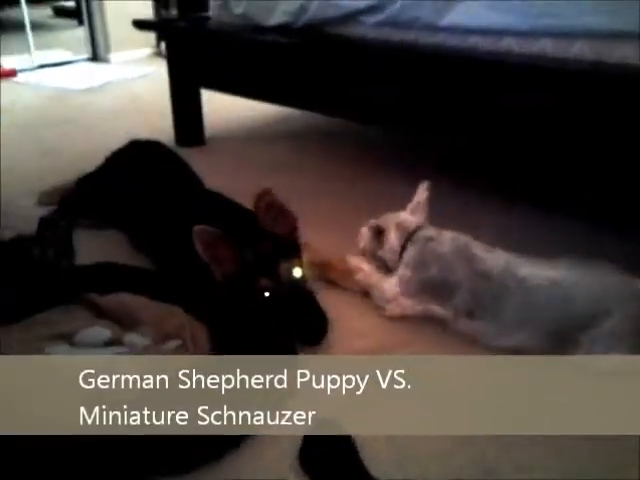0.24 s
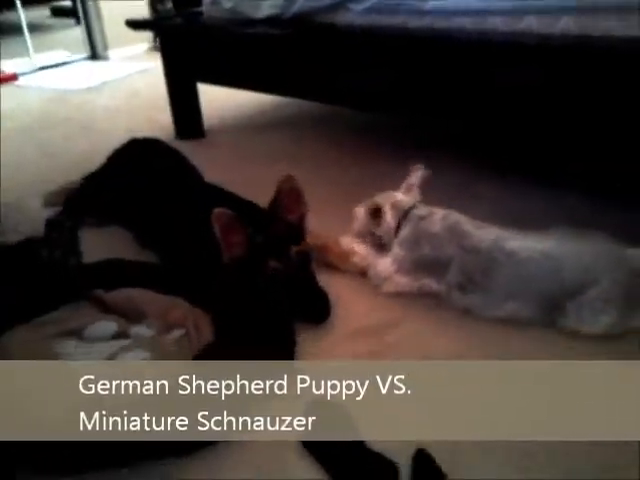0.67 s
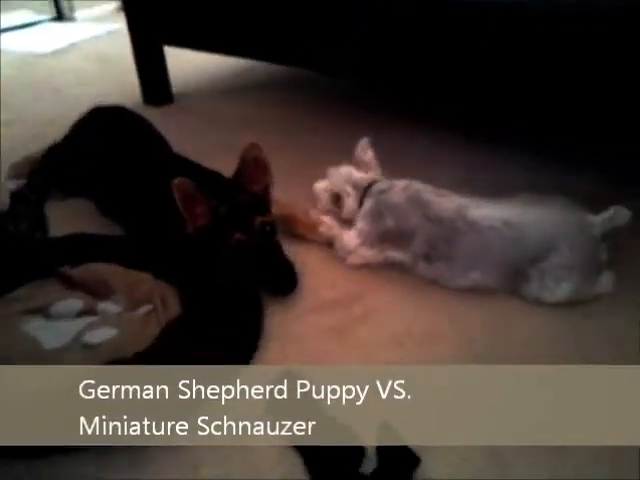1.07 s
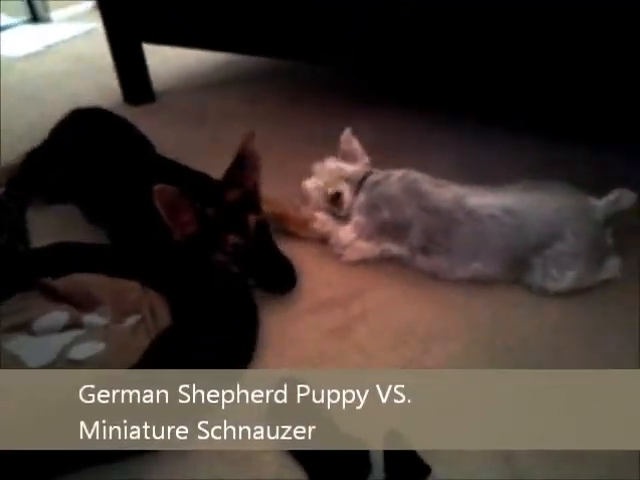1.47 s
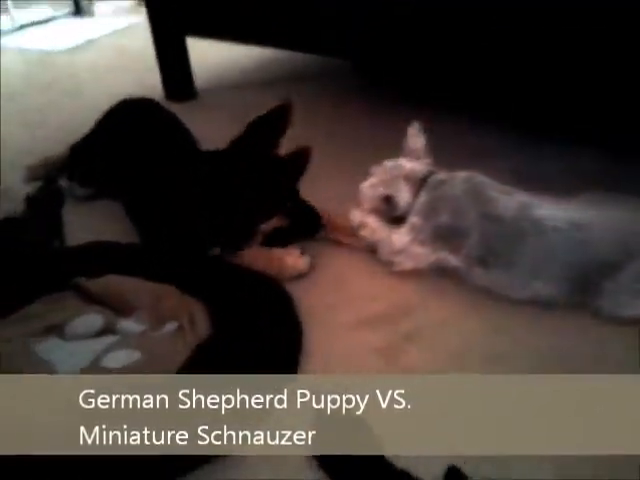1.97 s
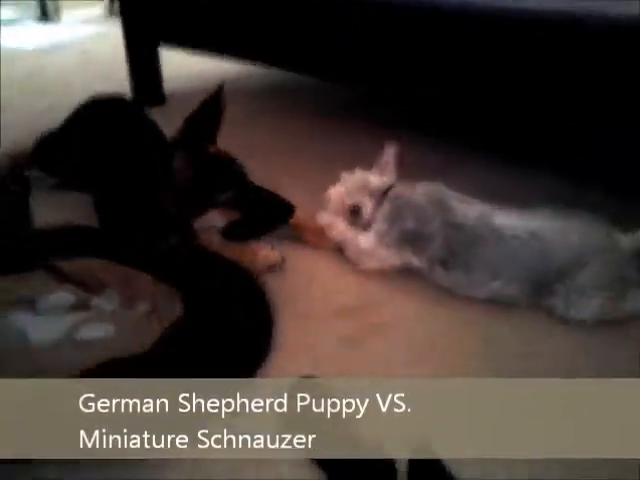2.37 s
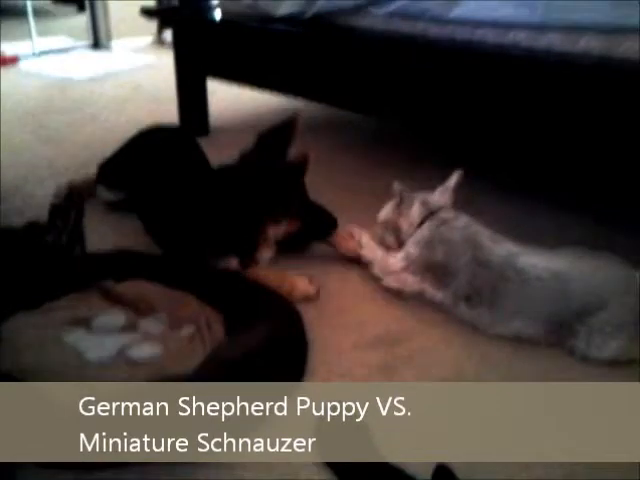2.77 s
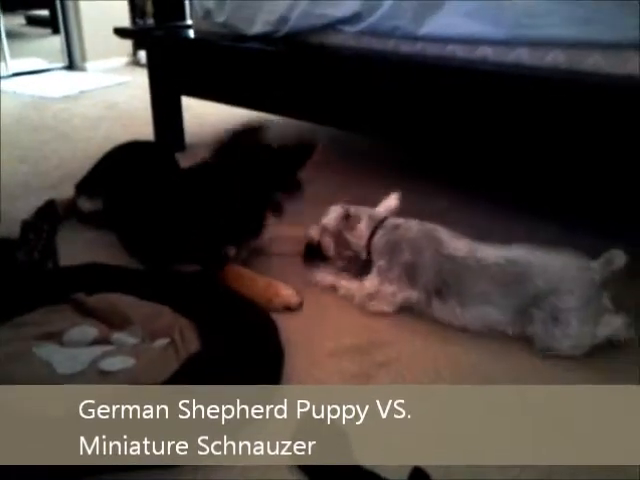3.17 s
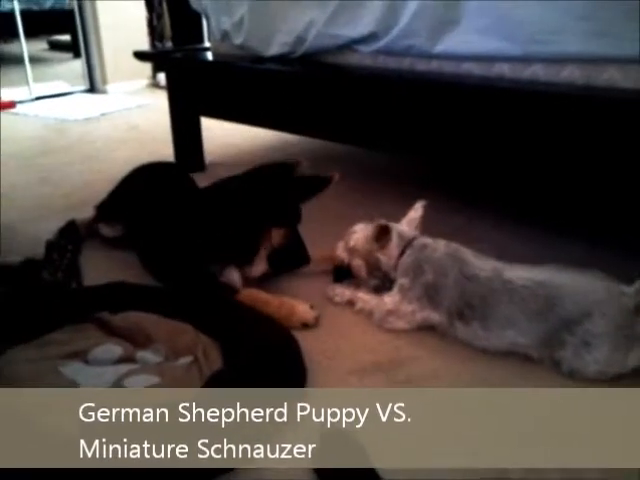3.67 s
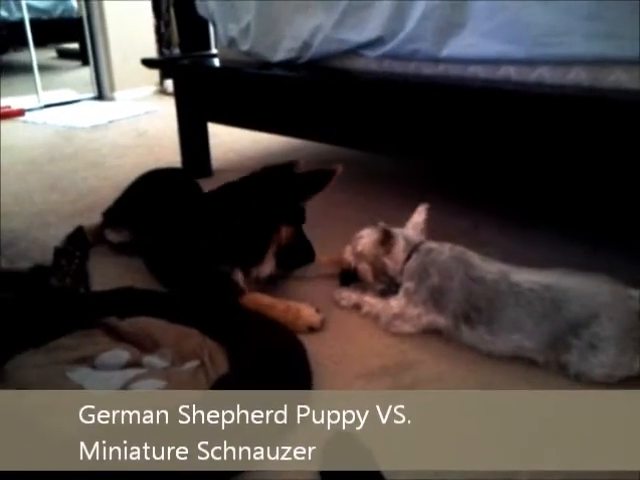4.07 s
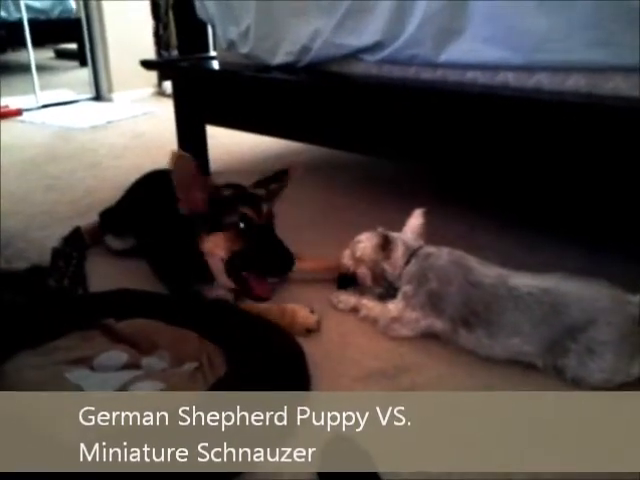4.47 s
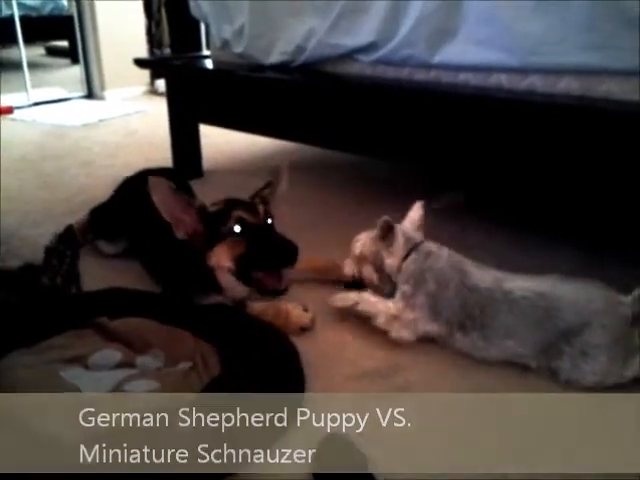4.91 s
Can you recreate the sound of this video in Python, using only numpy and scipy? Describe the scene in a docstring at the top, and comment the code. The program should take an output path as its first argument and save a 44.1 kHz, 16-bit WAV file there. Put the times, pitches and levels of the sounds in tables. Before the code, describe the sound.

Indoors, with brief room ring and faint low background noise, a dog gnaws something hard in irregular clicks. A puppy whines very high through its nose, yelps twice and moans. Two fast yips, a paw thump and a bark follow, then slow separate growl pulses, a muted woof, another short growl, and a loud, slightly overloaded yelp and moan.

```python
"""Two dogs squabble over a chew

On a bedroom carpet a shepherd puppy whistles through its nose, yelps and moans; a small schnauzer gnaws,
snaps with yips, a bark and a woof, and growls in slow separate pulses. Voices are harmonic sources shaped
by a throat filter, whistles are gliding tones, bites and growl pulses ring resonances, and air, scuffs, puffs
and a thump are coloured noise. The room rings briefly and the loudest yelps overload the microphone."""
import sys
import numpy as np
from scipy import signal
from scipy.fft import rfft, irfft, next_fast_len
from scipy.io import wavfile

SR = 44100
rng = np.random.default_rng(int(sys.argv[2]) if len(sys.argv) > 2 else 0)


def generate_wav(signal):
    """Clip the signal to [-1, 1] and save it as 16-bit WAV at the path in sys.argv[1]."""
    frames = np.transpose(np.atleast_2d(signal))
    scaled = np.clip(frames, -1, 1) * 32767
    pcm = np.round(scaled).astype(np.int16)
    wavfile.write(sys.argv[1], SR, pcm)


N = 226787
TIME = np.arange(N) / SR
CUTOFF_HZ = 15750  # top of the recorded band

# Table levels are relative within a layer; scene() sets the gain of each layer.


def from_db(db):
    """Convert decibels to an amplitude ratio."""
    return 10 ** (np.asarray(db) / 20)


def rms_one(x):
    """Normalise the effective (rms) value to one."""
    return x / np.sqrt(np.mean(x ** 2) + 1e-20)


def at_hz(points, hz):
    """Interpolate a spectrum linearly along a logarithmic frequency axis."""
    f, value = np.transpose(points)
    return np.interp(np.log(np.maximum(hz, 1)), np.log(f), value)


def follow(rows, fade_s):
    """Piecewise-linear control: the samples covered, a raised-cosine gate, and the columns at those samples."""
    s, *columns = np.transpose(rows)
    at = np.flatnonzero((TIME > s[0] - fade_s) & (TIME < s[-1] + fade_s))
    inside = np.minimum(TIME[at] - s[0], s[-1] - TIME[at])
    gate = np.sin(np.pi / 2 * np.clip(1 + inside / fade_s, 0, 1)) ** 2
    return at, gate, [np.interp(TIME[at], s, column) for column in columns]


def span(start, length, fade_s):
    """Time window: the samples covered, a gate with soft ends, and the time since the start."""
    at, gate, (t,) = follow([(start, 0), (start + length, length)], fade_s)
    return at, gate, t


def drift(rate_hz, size):
    """Slow random modulation: white noise through a double-pole low-pass, rms 1."""
    r = np.exp(-2 * np.pi * rate_hz / SR)
    warm_up = 4000  # samples discarded while the filter settles
    slow = signal.lfilter([1], [1, -2 * r, r * r], rng.standard_normal(size + warm_up))
    return rms_one(slow[warm_up:])


def noise(colour, size, tilt_db=0):
    """Spectral shaping: white noise weighted by a colour and a tilt per octave above 500 Hz, rms 1."""
    padded = next_fast_len(size)
    hz = np.maximum(np.fft.rfftfreq(padded, 1 / SR), 1)
    gain = from_db(at_hz(colour, hz) + tilt_db * np.log2(np.maximum(hz, 500)))
    gain = gain * np.minimum(hz / colour[0][0], 1) ** 2  # falls away below the first colour point
    return rms_one(irfft(rfft(rng.standard_normal(padded)) * gain, padded)[:size])


def swell(row, colour, fade_s):
    """Turbulent noise with an exponential envelope: the level changes steadily in dB between soft ends."""
    start, length, level_db, db_per_s = row
    at, gate, t = span(start, length, fade_s)
    out = np.zeros(N)
    out[at] = gate * from_db(level_db + db_per_s * t) * noise(colour, len(at))
    return out


def resonate(x, modes):
    """Modal synthesis: parallel two-pole resonances summed with alternating signs."""
    out = 0
    for k, (hz, width, db) in enumerate(modes):
        r = np.exp(-np.pi * width / SR)
        poles = [1, -2 * r * np.cos(2 * np.pi * hz / SR), r * r]
        gain = (-1) ** k * from_db(db) * (1 - r * r) / 2
        out = out + gain * signal.lfilter([1, 0, -1], poles, x)
    return out


def add(track, s, sound):
    """Superpose a short sound on a track at a given time."""
    i = max(int(s * SR), 0)
    track[i:i + len(sound)] += sound[:N - i]


def floor_noise():
    """Stationary background: one steady coloured noise throughout."""
    # background spectrum: hz, level_db
    background_colour = [(12, -36.5), (20, -7.5), (54, -3), (144, -9.5), (180, -10), (259, -15),
                         (298, -8.5), (393, -12), (491, -15), (1100, -18.5), (1340, -14.5), (1500, -20.5),
                         (6360, -25), (15500, -30)]
    return from_db(-60) * noise(background_colour, N)


def scuffs_and_puffs(grain_db):
    """Random noise: muzzles and paws scuff the carpet, and a dog puffs, in short bursts of noise."""
    # bursts: start_s, length_s, level_db, tilt_db_per_octave
    burst_rows = [(0.0, 0.016, -48, -5.5), (0.067, 0.042, -45, 4.5), (0.125, 0.023, -48.5, 4),
                  (0.294, .045, -57, 9.5), (0.741, 0.18, -56.5, -3.5), (0.931, 0.077, -60, -4),
                  (1.25, 0.23, -63.5, 4), (2.315, 0.07, -54.5, -12), (2.818, 0.028, -47.5, -0.5),
                  (3.07, 0.039, -48.5, 3), (3.101, 0.099, -55.5, 4), (3.231, 0.097, -47, -2),
                  (4.565, 0.064, -58.5, -7.5), (4.622, 0.036, -52.5, -6.5)]
    # burst spectrum: hz, level_db
    burst_colour = [(200, -2.5), (700, -7), (2000, 2), (4000, -1.5), (7000, -3), (10000, -11),
                    (15000, -12.5)]
    out = np.zeros(N)
    for s, length, level_db, tilt_db in burst_rows:
        at, gate, (db,) = follow([(s, level_db), (s + length, level_db - 3)], fade_s=0.0065)
        grain = grain_db * drift(200, len(at))
        out[at] += gate * from_db(db + grain) * noise(burst_colour, len(at), tilt_db)
    return out


def bites(crumble, crumble_s, size=3000):
    """Impulse excitation: a crack and decaying crumbs ring the chew and jaw, differently each time."""
    # teeth cracking the chew: start_s, peak_db, tilt_db_per_octave
    bite_rows = [(0.066, -40.5, -1), (0.594, -46.5, -13), (0.728, -28, -1.0), (0.781, -30, -1.5),
                 (0.821, -33.5, -2), (0.85, -31.5, -1.0), (0.866, -34.5, -6), (0.966, -40.5, -3),
                 (1, -25.5, 2), (1.162, -37, -2.5), (1.275, -40.5, -2), (2.257, -38, 10),
                 (2.336, -36.5, -6.5), (4.437, -37, -2.5)]
    # resonances of chew and jaw: hz, width_hz, level_db
    chew_modes = [(700, 360, 4), (1360, 800, -4), (2300, 1200, -2.5), (3800, 1500, -3), (6200, 1200, -3.5),
                  (9900, 4000, -18)]
    out, t = np.zeros(N), TIME[:size]
    for s, peak_db, tilt_db in bite_rows:
        # cubed noise is sparse: a few strong crumbs
        crumbs = rng.standard_normal(size) ** 3 * np.exp(-t / crumble_s)
        crack = (t == 0) + crumble * crumbs
        modes = [(hz, width, db + rng.normal(0, 1) + tilt_db * np.log2(hz / 2000))
                 for hz, width, db in chew_modes]
        ring = resonate(crack, modes)
        add(out, s, from_db(peak_db) * ring / np.abs(ring).max())
    return out


def nose_air():
    """Turbulence: air rushes past the long whistle."""
    # air: start_s, length_s, level_db, swell_db_per_s
    air_row = (1.6, .38, -64.5, 11)
    # air spectrum: hz, level_db
    air_colour = [(1500, -4), (3500, -11), (4300, 0.5), (7000, -1.5), (9000, -17), (15000, -15)]
    return swell(air_row, air_colour, fade_s=.035)


def whistle(gesture, waver, third_db, flicker_db):
    """Whistle tone: a frequency-modulated fundamental with two overtones and a flickering level."""
    at, gate, pitch, level_db, octave_db = gesture
    phase = 2 * np.pi * np.cumsum(pitch * (1 + waver * drift(440, len(at)))) / SR
    octave = from_db(octave_db)
    tone = (np.sin(phase) + octave * np.sin(2 * phase)) / np.hypot(1, octave)
    tone = tone + from_db(third_db) * np.sin(3 * phase)
    flicker = flicker_db * drift(40, len(at))
    out = np.zeros(N)
    out[at] = np.sqrt(2) * gate * from_db(level_db + flicker) * tone
    return out


def long_whistle(fade_s):
    """Mode jump: the nasal whistle tips into its octave as its pitch sags."""
    # contour: time_s, pitch_hz, level_db
    contour = [(1.61, 4401, -53), (1.744, 4121, -52), (1.752, 4103, -42), (1.778, 4396, -52),
               (1.858, 4335, -47), (1.898, 4097, -43.5), (1.918, 4030, -50), (1.938, 3987, -45),
               (1.98, 4296, -47)]
    at, gate, (pitch, level_db) = follow(contour, fade_s)
    even_hz, hz_per_db = 4170, 14.5  # octave and fundamental are equal at even_hz
    return at, gate, pitch, level_db, (even_hz - pitch) / hz_per_db


def squeak(row, fade_s):
    """Glide: one quick sweep of a nasal tone that swells to a late peak."""
    start, length, start_hz, end_hz, bend, peak_db, octave_db = row
    at, gate, t = span(start, length, fade_s)
    peak_share, edge_db = .68, 11.5  # place of the peak in the length; drop at either end
    level_db = peak_db - edge_db * np.interp(t / length, [0, peak_share, 1], [1, 0, 1])
    pitch = start_hz + (end_hz - start_hz) * (t / length) ** bend
    return at, gate, pitch, level_db, octave_db


def squeaks():
    """Nasal whistle tones: short squeaks, each a separate glide."""
    # squeaks: start_s, length_s, start_pitch_hz, end_pitch_hz, bend (exponent), level_db, octave_db
    squeak_rows = [(1.983, .035, 5000, 5400, .6, -49, -12), (2.461, 0.04, 3790, 3330, 1.23, -38.5, 15),
                   (2.559, .04, 3190, 3830, 1, -33.5, 0), (4.819, 0.036, 4370, 3200, .7, -35, 0),
                   (4.909, 0.031, 3180, 3800, 1.63, -25, -11.5)]
    return sum(whistle(squeak(row, fade_s=.0066), waver=.018, third_db=-22, flicker_db=5.5)
               for row in squeak_rows)


def call(gesture, throat, jitter, flutter, air_db, hiss_db, clear_hz):
    """Source-filter voice: vocal-fold harmonics and puffs of air, shaped by throat and mouth resonances."""
    at, gate, pitch, level_db, mouth_db, upper_db, rough = gesture
    size = len(at)
    rough = np.clip(rough, 0, 1)
    phase = 2 * np.pi * np.cumsum(pitch * (1 + jitter * rough * drift(130, size))) / SR
    blur_hz = 70 + 450 * rough.mean()
    voice, power = 0, 0
    for k in range(1, int(CUTOFF_HZ / pitch.max()) + 1):
        hz = k * pitch
        # weights of the two resonances lifted by the mouth
        mouth = at_hz([(850, 0), (1100, 1), (1620, 1), (2000, 0)], hz)
        upper = at_hz([(1620, 0), (2000, 1), (2550, 1), (3200, .4), (4500, .25)], hz)
        gain = from_db(at_hz(throat, hz) + mouth * mouth_db + upper * upper_db)
        # high partials break up into flickering bands, wider in a rough voice
        clean = 1 / (1 + (hz / clear_hz) ** 4)
        smear = flutter * rough + (1 - clean) / 2
        shake = drift(blur_hz, size) * np.sin(k * phase) + drift(blur_hz, size) * np.cos(k * phase)
        voice = voice + gain * (clean * np.sin(k * phase) + smear * shake)
        power = power + gain ** 2 * (clean ** 2 / 2 + smear ** 2)
    # spectrum of air past the teeth: hz, level_db
    teeth_colour = [(500, -5.5), (1400, -1), (2500, 1.5), (3800, -20), (5200, -13.5), (7500, -11),
                    (10000, -26), (12000, -25), (15000, -35)]
    air = from_db(air_db) * noise(throat, size) + from_db(hiss_db) * noise(teeth_colour, size)
    puffs = air * rough * (1 + np.cos(phase))  # one puff per cycle
    sound = gate * from_db(level_db) * (voice / np.sqrt(power) + puffs)
    # high-pass below the voice: removes low rumble made by the fluttering partials
    rumble_cut = signal.butter(3, pitch.min() / 2, "high", fs=SR, output="sos")
    out = np.zeros(N)
    out[at] = signal.sosfilt(rumble_cut, sound)
    return out


def yelp(row, fade_s):
    """Driving pressure: a chest push swells the voice; pitch arches, then drops and roughens."""
    (start, length, rise_s, top_hz, end_hz, delay, attack, hold, release, push_db,
     mouth_db, mouth_swing_db, upper_db, upper_swing_db, rough) = row
    at, gate, t = span(start, length, fade_s)
    rise_breadth_s, fall_power = 0.13, 1.5
    rise = 1 - (np.minimum(t - rise_s, 0) / rise_breadth_s) ** 2
    fall = np.clip((t - rise_s) / (length - rise_s), 0, 1) ** fall_power
    pitch = top_hz * rise + (end_hz - top_hz) * fall
    push = np.interp(t, np.cumsum([delay, attack, hold, release]), [0, 1, 1, 0])
    soft_db, soft_dull_db = -24.5, 8  # unpushed: level, and loss in the upper resonance
    level_db = 20 * np.log10(push * from_db(push_db) + (1 - push) * from_db(soft_db))
    # the timbre change is complete 0.3 octave below the top pitch
    sag = np.clip(np.log2(top_hz / pitch) / .3, 0, 1)
    mouth_db = mouth_db + mouth_swing_db * sag
    upper_db = upper_db + upper_swing_db * sag - soft_dull_db * (1 - push)
    # the voice breaks at the end of the fall unless it is pushed
    rough = rough + .06 * sag + 0.19 * fall ** 2 * np.sqrt(1 - push)
    return at, gate, pitch, level_db, mouth_db, upper_db, rough


def yelps():
    """Source-filter voice: the puppy's yelps through one throat."""
    # yelps: start_s, length_s, rise_s, top_pitch_hz, end_pitch_hz, push_delay_s, push_attack_s,
    # push_hold_s, push_release_s, push_level_db, mouth_lift_db, mouth_swing_db, upper_lift_db,
    # upper_swing_db, roughness (0-1)
    yelp_rows = [(1.986, .096, .024, 814.5, 640, 0.057, 0.0096, 0.0048, .026, -7, -3, -13, -2, 11, .005),
                 (2.406, .076, 0.043, 808, 660, -0.0054, 0.029, 0.029, 0.0053, -4.5, -6.5, 10.5, 3.5, 14.5, 0.01),
                 (4.709, .096, .056, 796.7, 523, .002, 0.025, 0.058, .016, -7, 10, 15, 3, 28.5, 0.07)]
    # throat spectrum: hz, level_db
    throat = [(300, -6), (550, 0), (850, 1.5), (1450, -9.5), (2300, -19.5), (3150, -34), (3900, -49),
              (4900, -39), (6200, -42.5), (7500, -41.5), (10000, -52), (15000, -68)]
    return sum(call(yelp(row, fade_s=.008), throat, jitter=0.083, flutter=0.58,
                    air_db=-13, hiss_db=-15, clear_hz=5900) for row in yelp_rows)


def rasps():
    """Turbulence: hoarse air trails the two big yelps."""
    # rasps: start_s, length_s, level_db, swell_db_per_s
    rasp_rows = [(2.468, 0.023, -36, 58.5), (2.528, 0.12, -49, 27), (2.699, .15, -50, 20),
                 (4.788, 0.145, -34, -60), (4.98, 0.024, -51, -1)]
    # rasp spectrum: hz, level_db
    rasp_colour = [(900, -0.5), (1500, 5), (2500, 4.5), (3600, -5.5), (5200, -1), (6200, -10.5),
                   (7400, -7.5), (9000, -9), (10300, -19), (12000, -10.5), (15000, -20.5)]
    return sum(swell(row, rasp_colour, fade_s=.022) for row in rasp_rows)


def moan(curve, voicing, fade_s):
    """Formant shift: the mouth opens with pitch; the voice is rough at its onset and where it is weak."""
    at, gate, (pitch, level_db) = follow(curve, fade_s)
    mouth_db, upper_db, onset_rough = voicing
    opening = np.tanh(np.log2(pitch / np.median(pitch)) / 0.097)  # scale in octaves
    # roughness doubles with every 5.5 dB below the loudest moment
    rough = 0.05 * 2 ** ((level_db.max() - level_db) / 5.5)
    settle_s = 0.09
    rough = rough + onset_rough * np.exp(-(TIME[at] - TIME[at[0]]) / settle_s)
    return at, gate, pitch, level_db, mouth_db + 8.5 * opening, upper_db + 5 * opening, rough


def moans():
    """Source-filter voice: the puppy's moans follow drawn curves of pitch and level."""
    # one curve per moan: time_s, pitch_hz, level_db
    curves = [
        [(2.6, 664.6, -40.5), (2.648, 663, -39.5), (2.662, 680.7, -26.5), (2.72, 699.4, -22), (2.75, 696, -22),
         (2.796, 561, -40), (2.81, 543, -37)],
        [(4.94, 460.7, -25), (4.984, 422, -25.5), (5.024, 439, -23.5), (5.054, 424, -29.5), (5.12, 490, -21),
         (5.135, 495, -18)],
    ]
    # one row per moan: mouth_lift_db, upper_lift_db, onset_roughness (0-1)
    voicings = [(-5, 5, 0), (-2, 11, 0.23)]
    # throat spectrum: hz, level_db
    throat = [(250, -2), (420, 3), (720, -1), (900, -2.5), (1400, -8), (1800, -16), (2200, -19),
              (2700, -28), (3400, -68), (4100, -32.5), (5100, -40), (6000, -40), (7200, -40), (15000, -75)]
    return sum(call(moan(curve, voicing, fade_s=0.013), throat, jitter=0.063, flutter=0.47,
                    air_db=-9.5, hiss_db=-15, clear_hz=7000)
               for curve, voicing in zip(curves, voicings))


def snap(row, fade_s):
    """Fold tension: pitch reaches its extreme at the level peak; slack coarsens and throat flaps throb."""
    (start, length, peak_s, rest_hz, peak_hz, peak_db, rough,
     mouth_db, upper_db, throb_hz, throb_db, fade_db) = row
    at, gate, t = span(start, length, fade_s)
    pitch_width_s, onset_db = .025, 13  # width of the pitch extreme; rise from onset to peak
    slack = 1 - np.exp(-((t - peak_s) / pitch_width_s) ** 2)
    pitch = peak_hz + (rest_hz - peak_hz) * slack
    level_db = peak_db - np.interp(t, [0, peak_s, length], [onset_db, 0, fade_db])
    level_db = level_db - throb_db * np.sin(np.pi * throb_hz * (t - peak_s)) ** 4
    return at, gate, pitch, level_db, mouth_db + 10 * slack, upper_db + 6 * slack, rough + 0.17 * slack


def snaps_of(kind, fade_s):
    """Articulation: the gestures of one kind of short schnauzer call."""
    # short calls: start_s, length_s, peak_time_s, rest_pitch_hz, peak_pitch_hz, level_db, roughness (0-1),
    # mouth_lift_db, upper_lift_db, throb_rate_hz, throb_depth_db, end_fade_db, kind
    snap_rows = [(3.187, 0.07, 0.03, 499, 605.7, -22.5, 0.07, -2.5, -2.5, 0, 0, 14, "yip"),
                 (3.26, 0.043, 0.028, 493.5, 528.6, -31.5, 0.74, 4, 27, 0, 0, 10.5, "yip"),
                 (3.358, 0.11, .035, 329.7, 411.8, -18.5, 0.1, -2.5, 3, 27.5, 4.5, 13, "bark"),
                 (4.045, 0.066, .010, 351, 332, -29.5, 0, -40, -27, 32.5, 10.5, 5.5, "woof")]
    return [snap(row[:-1], fade_s) for row in snap_rows if row[-1] == kind]


def yips():
    """Source-filter voice: two high, breathy yips."""
    # throat spectrum: hz, level_db
    throat = [(200, 8), (550, -0.5), (1150, -15), (1750, -25.5), (2450, -7.5), (3300, -40.5), (6000, -45),
              (10000, -42.5), (15000, -46)]
    return sum(call(gesture, throat, jitter=0.093, flutter=0.57, air_db=2.5, hiss_db=-5.5, clear_hz=3200)
               for gesture in snaps_of("yip", fade_s=0.0056))


def thump():
    """Low-frequency impact: a paw bumps the floor, as a dying band of bass noise."""
    # bump: start_s, length_s, level_db, swell_db_per_s
    bump_row = (3.22, .25, -35, -110)
    # bump spectrum: hz, level_db
    bump_colour = [(12, -38.5), (20, -3), (43, 6.5), (94, -6), (124, -20), (220, -10), (290, -39),
                   (480, -120)]
    return swell(bump_row, bump_colour, fade_s=.03)


def barks():
    """Source-filter voice: a lower bark with strongly fluttering partials."""
    # throat spectrum: hz, level_db
    throat = [(150, 9), (350, 3.5), (800, 4.5), (1200, 8.5), (1650, -46), (2050, -10), (2500, -5.5),
              (3300, -16.5), (5500, -12), (7500, -24), (9000, -33), (10500, -46), (15000, -70.5)]
    return sum(call(gesture, throat, jitter=0.112, flutter=0.91, air_db=-28, hiss_db=-13, clear_hz=3250)
               for gesture in snaps_of("bark", fade_s=.008))


def flaps():
    """Relaxation pulses: the throat flaps at a steady or slowing pace; yields s, peak dB, treble dB."""
    # growls: start_s, length_s, first_gap_s, gap_lengthening_s, peak_db, swell_db_per_s, treble_db
    growl_rows = [(3.486, .42, .035, .0014, -27, -27, -1.5), (4.504, .18, .0395, 0, -33, 0, -2.5)]
    for start, length, gap, lengthening, peak_db, db_per_s, treble_db in growl_rows:
        t = 0
        while t < length:
            strength_db, colour_db = rng.normal(0, .5, 2)  # flaps differ a little
            yield start + t, peak_db + db_per_s * t + strength_db, treble_db + colour_db
            t = t + gap
            gap = gap + lengthening


def growl(rasp, size=3000):
    """Pulse excitation: each flap is an impulse and a short rasp of air that ring the throat."""
    # throat resonances: hz, width_hz, level_db
    throat_modes = [(144, 30, -0.5), (219, 41, 0), (305.4, 91, 2.5), (440, 150, -3), (824, 124, -12),
                    (1277, 103, -5.5), (2293, 280, -14), (2805, 210, -14.5), (5620, 2020, -30.5)]
    out, t = np.zeros(N), TIME[:size]
    treble_only = signal.butter(2, 600, "high", fs=SR, output="sos")
    for s, peak_db, treble_db in flaps():
        air = signal.sosfilt(treble_only, rng.standard_normal(size)) * np.exp(-t / .005)
        # the treble setting acts gradually from 250 to 2500 Hz
        modes = [(hz, width, db + treble_db * np.clip(np.log10(hz / 250), 0, 1))
                 for hz, width, db in throat_modes]
        ring = resonate((t == 0) + rasp * air, modes)
        add(out, s, from_db(peak_db) * ring / np.abs(ring).max())
    return out


def woofs():
    """Source-filter voice: a dull, throbbing woof."""
    # throat spectrum: hz, level_db
    throat = [(150, -17), (335, 6), (680, -25.5), (1400, -11), (2400, -15), (4000, -56), (15000, -71)]
    return sum(call(gesture, throat, jitter=0.017, flutter=0.11, air_db=-34, hiss_db=-44, clear_hz=2014)
               for gesture in snaps_of("woof", fade_s=0.01))


def echoes(x):
    """Specular reflection: delayed copies from the bed frame and the wall."""
    # reflections: delay_s, level_db
    reflections = [(.0097, -2), (.019, -5.5)]
    return sum(from_db(db) * np.interp(TIME - delay, TIME, x, left=0) for delay, db in reflections)


def room(x, onset_s):
    """Diffuse reverberation: bands of noise that build up together and decay at their own rates."""
    # reverberation time: hz, t60_s
    decay_times = [(150, 0.61), (700, 0.24), (2000, 0.35), (6000, 0.35), (15000, 0.083)]
    t, response = TIME[:SR * 2 // 3], 0
    edges = np.geomspace(70, 18000, 9)
    for low, high in zip(edges, edges[1:]):
        band_pass = signal.butter(2, [low, high], "band", fs=SR, output="sos")
        band = signal.sosfilt(band_pass, rng.standard_normal(len(t)))
        response = response + band * from_db(-60 * t / at_hz(decay_times, np.sqrt(low * high)))
    response = response * (1 - np.exp(-(t / onset_s) ** 2))
    return signal.fftconvolve(x, response / np.sqrt(np.sum(response ** 2)))[:N]


def scene():
    """Superposition: layers sound directly and most excite the room; background and thump stay dry."""
    bursts = scuffs_and_puffs(grain_db=3.0)
    gnawing = from_db(0.5) * bites(crumble=0.013, crumble_s=0.0017)
    whine = whistle(long_whistle(fade_s=.0066), waver=0.0034, third_db=-19.5, flicker_db=5.0)
    nose = from_db(5.5) * nose_air() + from_db(-3.0) * whine + from_db(-1.5) * squeaks()
    yelping = from_db(-1.5) * yelps()
    hoarse = from_db(-0.5) * rasps()
    moaning = from_db(-1.5) * moans()
    yip, bark, woof = yips(), barks(), woofs()
    rumble = from_db(-3.5) * growl(rasp=0.15)

    direct = bursts + gnawing + nose + yelping + hoarse + moaning
    direct = direct + from_db(-1.0) * (yip + bark) + woof + rumble + echoes(rumble)

    sent = from_db(-11.5) * (moaning + bursts + hoarse) + from_db(-5.0) * gnawing + from_db(-8.5) * nose
    sent = sent + from_db(-10.5) * (yelping + yip) + from_db(-7.5) * bark
    sent = sent + from_db(-16.5) * woof + from_db(-6) * rumble

    unreflected = from_db(-0.5) * floor_noise() + from_db(-5.0) * thump()
    return (direct + room(sent, onset_s=0.0042) + unreflected)[None]


def record(dry):
    """Saturation and band-limiting: peaks round off unevenly at full scale; deepest bass and top are cut."""
    rounded = dry / (1 + dry ** 8) ** (1 / 8)
    lopsided = rounded + .006 * rounded ** 4  # the even power treats the two halves of the wave unequally
    bass_cut = signal.butter(2, 30, "high", fs=SR, output="sos")
    top_cut = signal.ellip(10, .1, 90, CUTOFF_HZ, fs=SR, output="sos")
    return signal.sosfilt(top_cut, signal.sosfilt(bass_cut, lopsided))


dry = scene()
out = record(dry)
generate_wav(out)
```